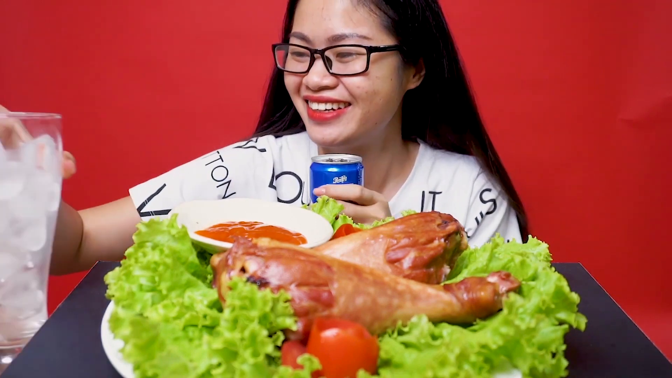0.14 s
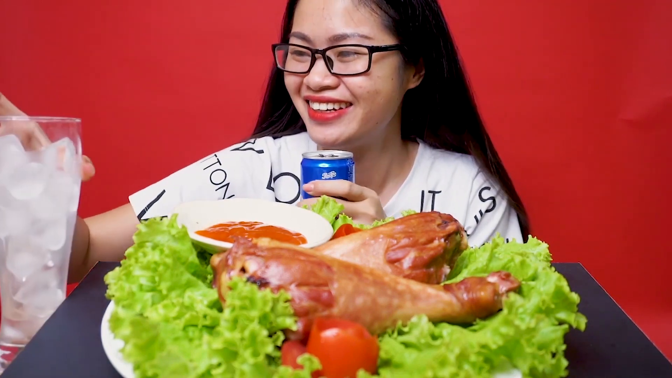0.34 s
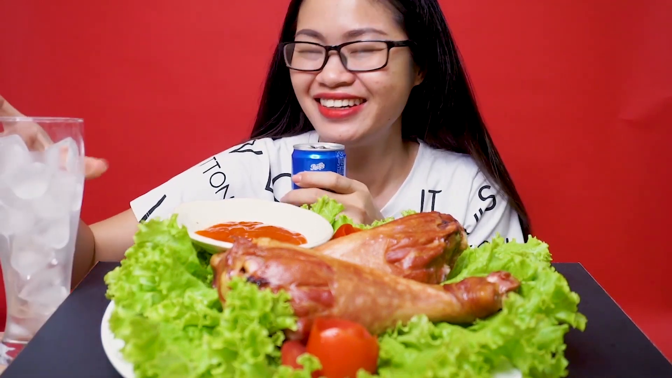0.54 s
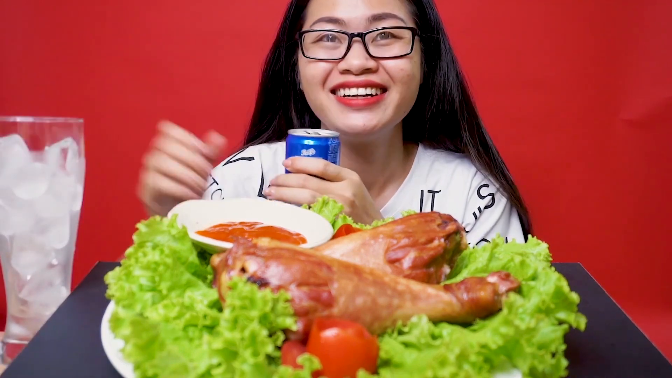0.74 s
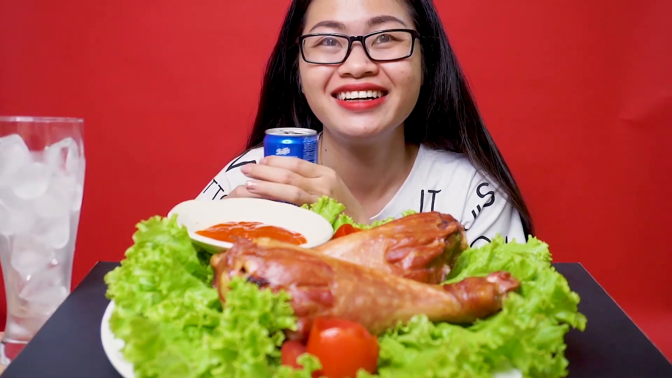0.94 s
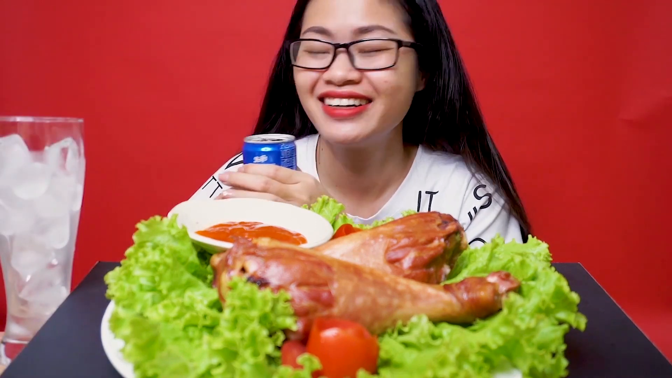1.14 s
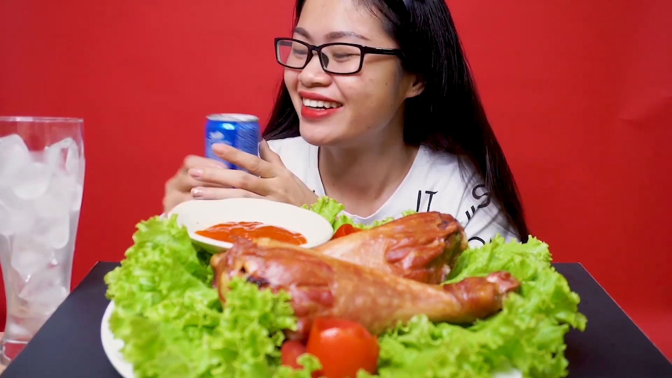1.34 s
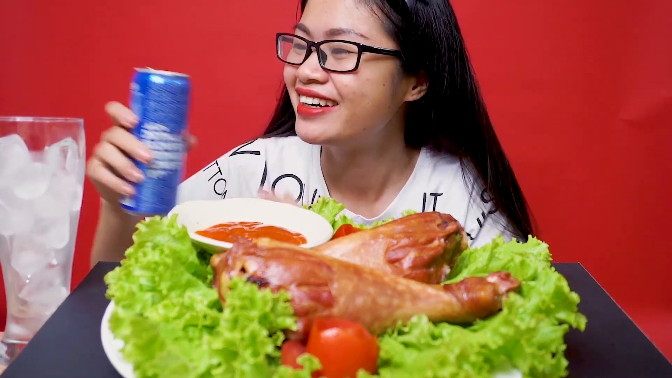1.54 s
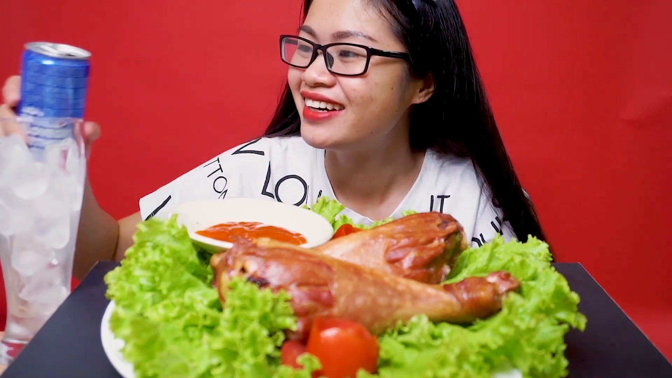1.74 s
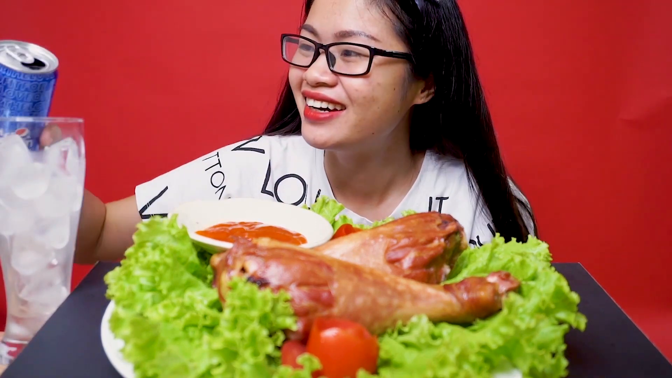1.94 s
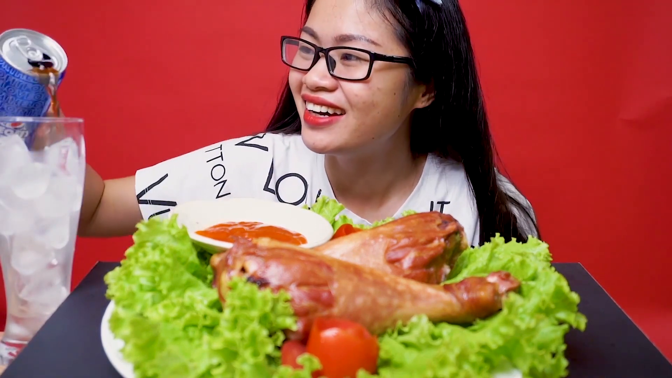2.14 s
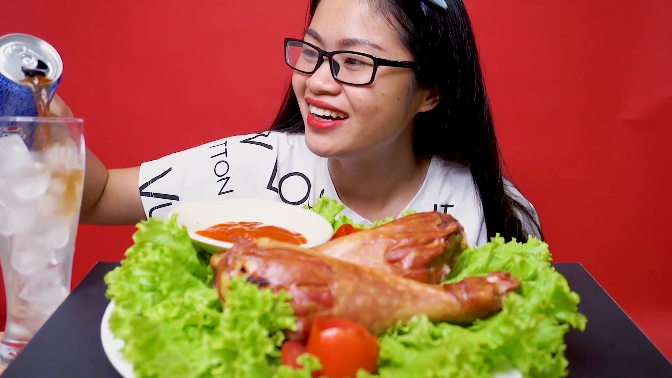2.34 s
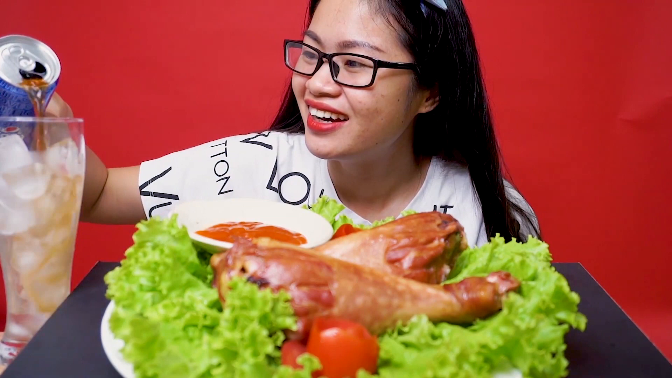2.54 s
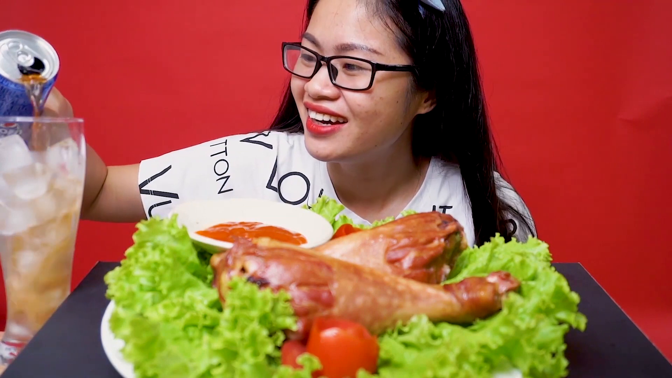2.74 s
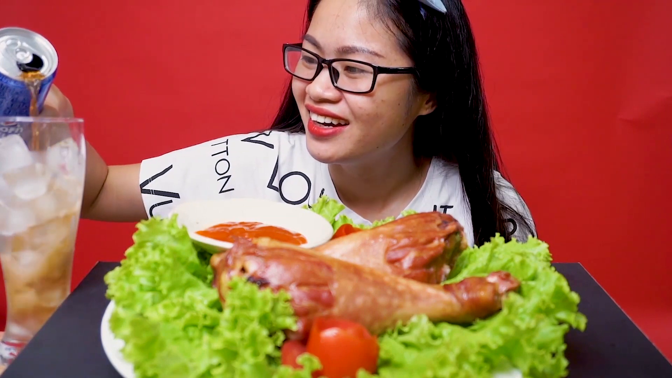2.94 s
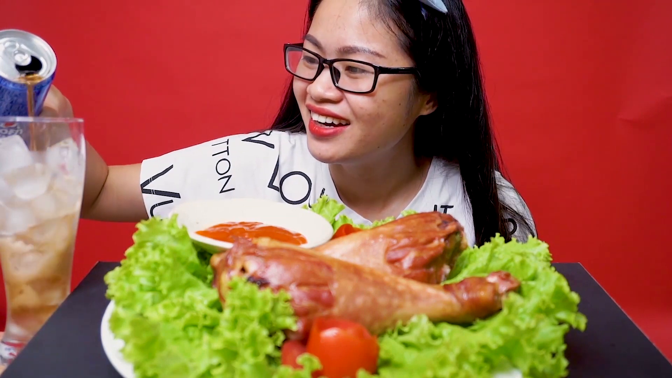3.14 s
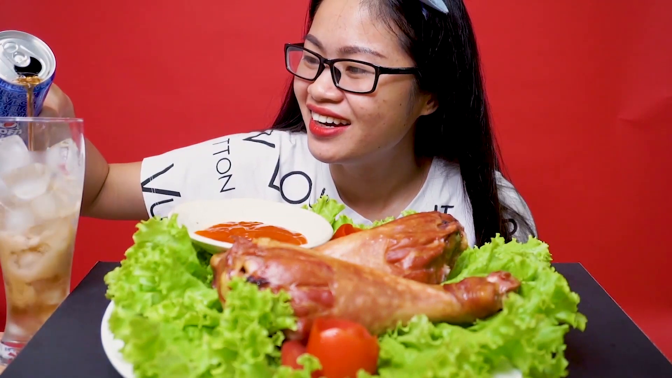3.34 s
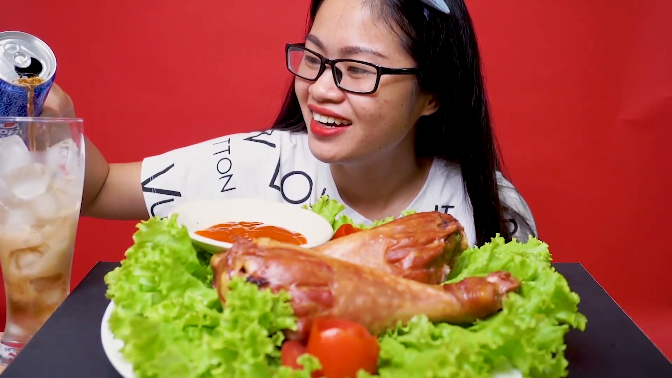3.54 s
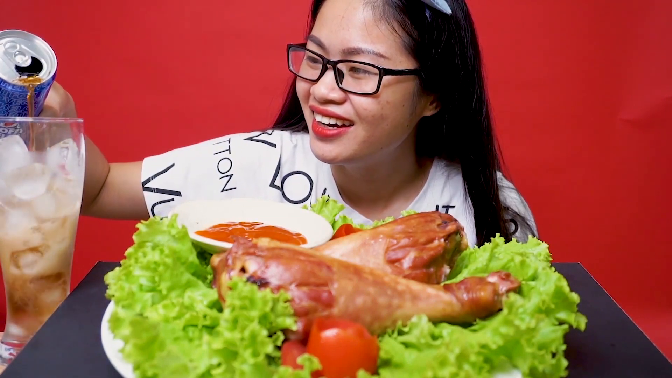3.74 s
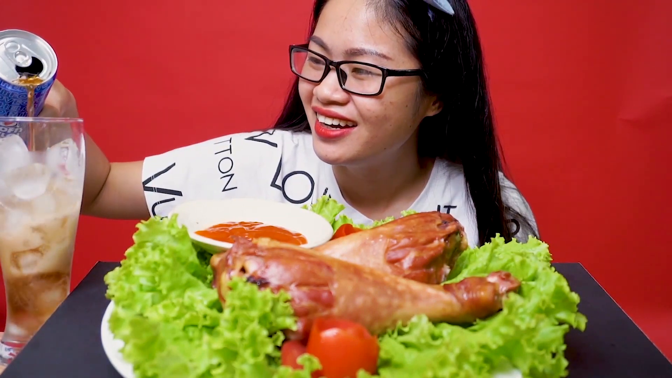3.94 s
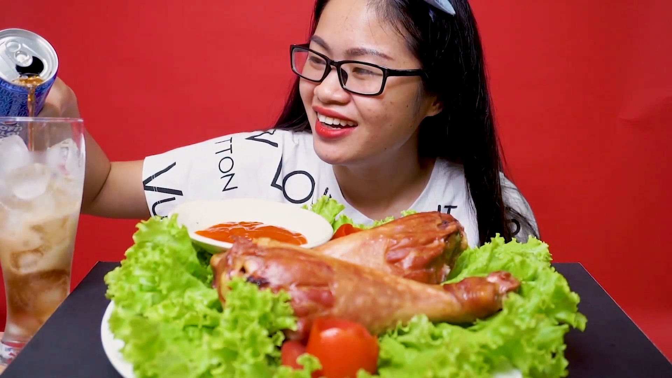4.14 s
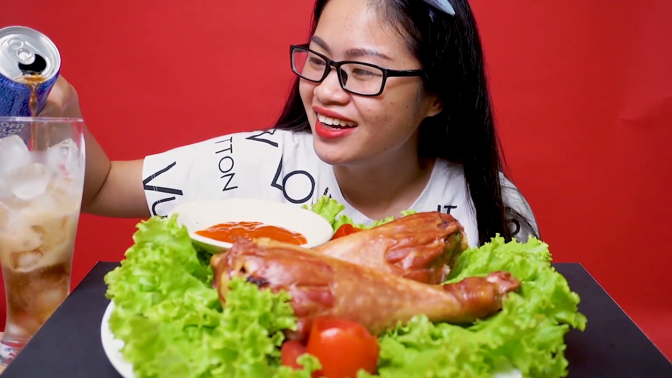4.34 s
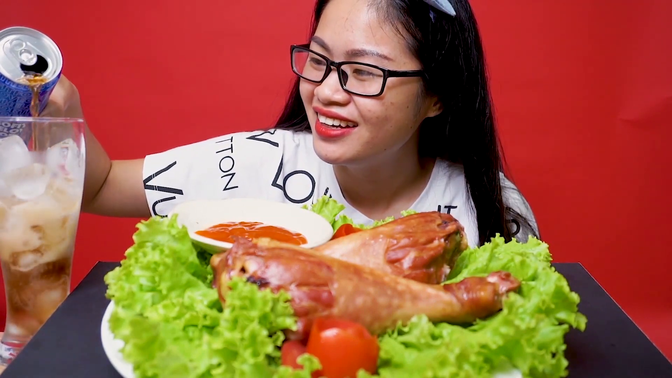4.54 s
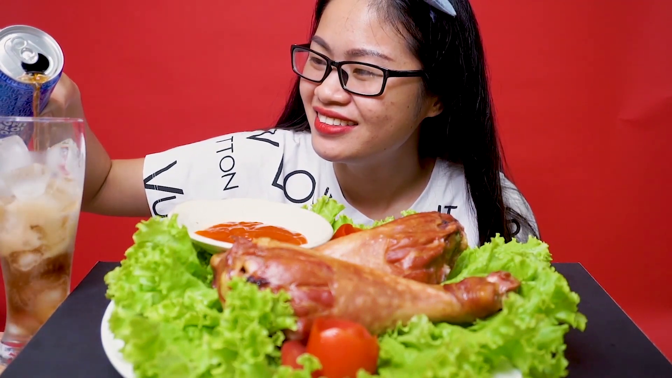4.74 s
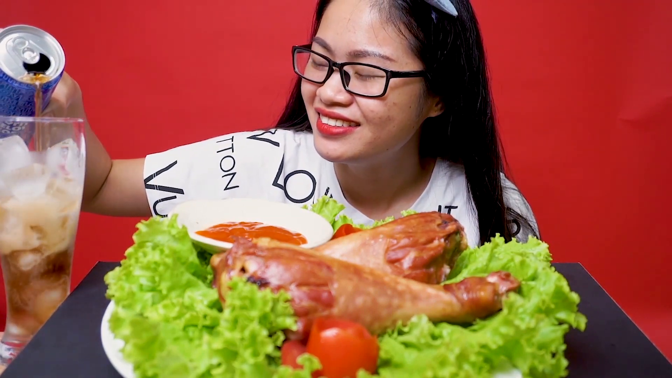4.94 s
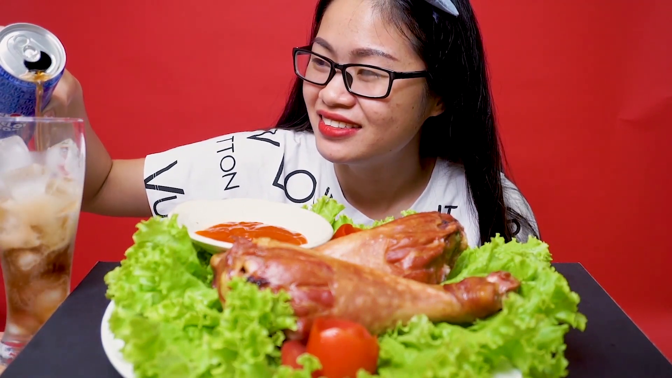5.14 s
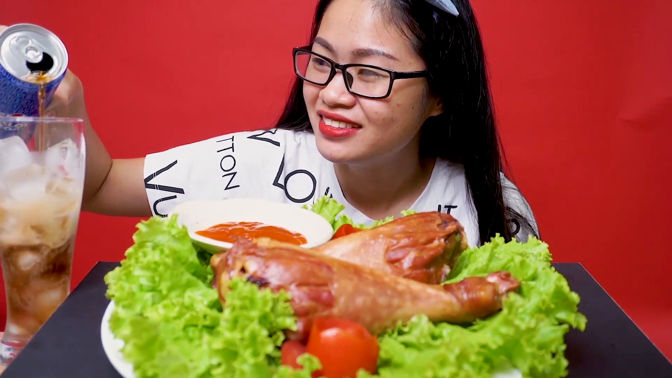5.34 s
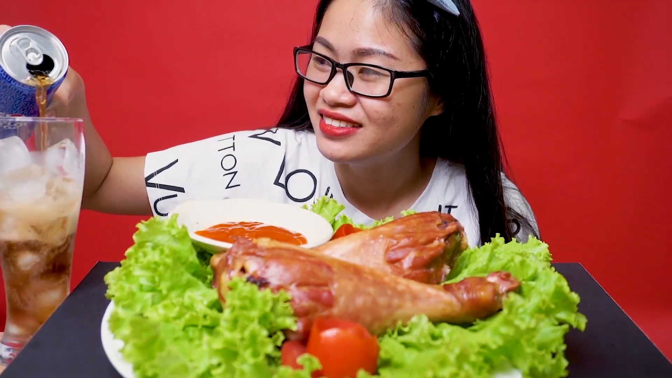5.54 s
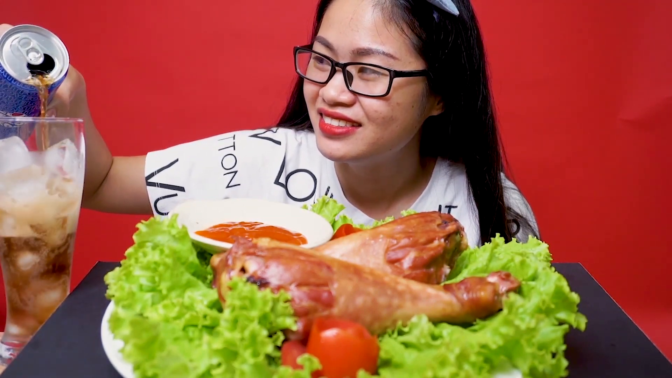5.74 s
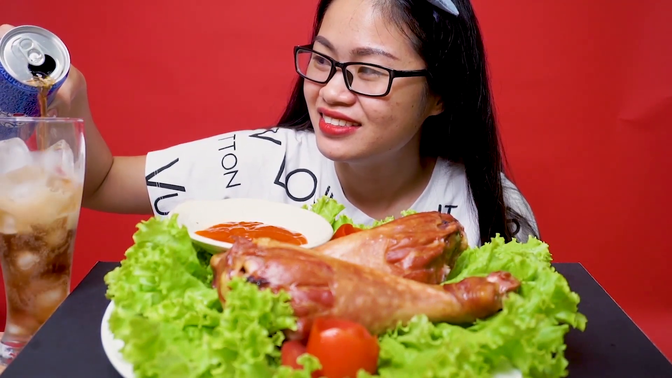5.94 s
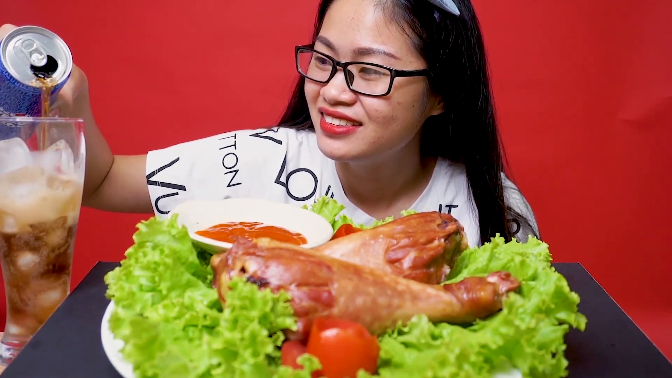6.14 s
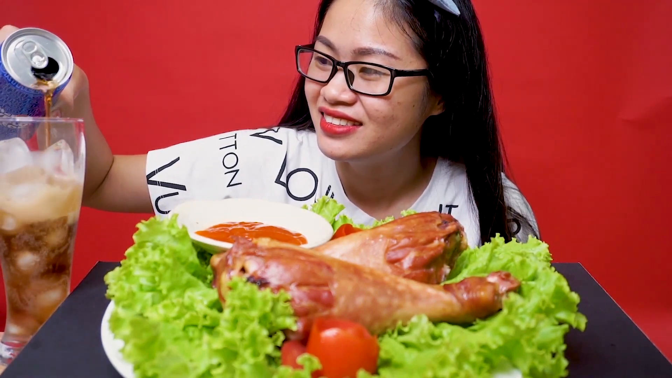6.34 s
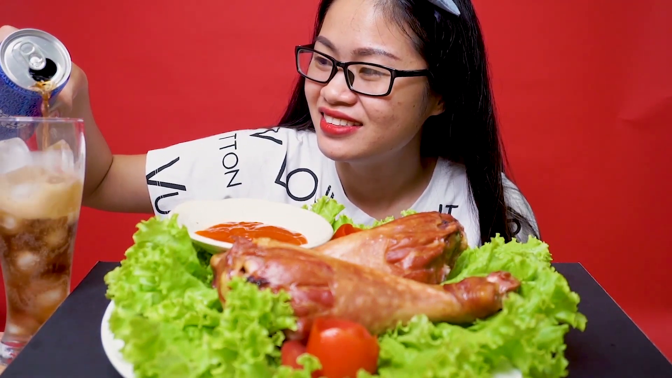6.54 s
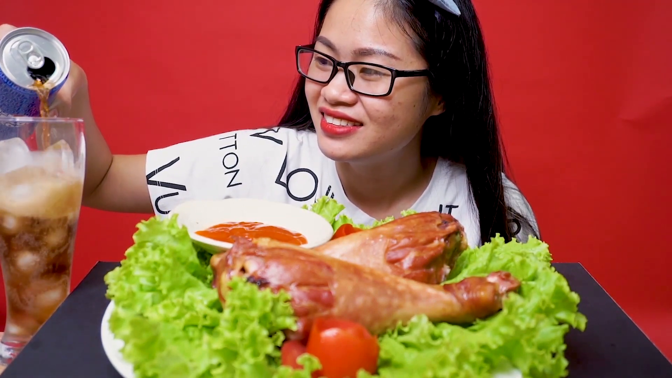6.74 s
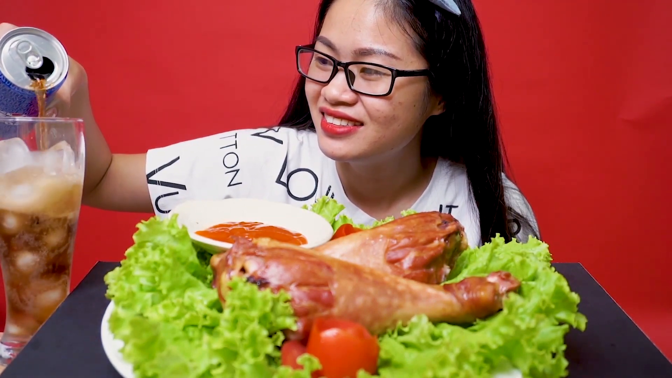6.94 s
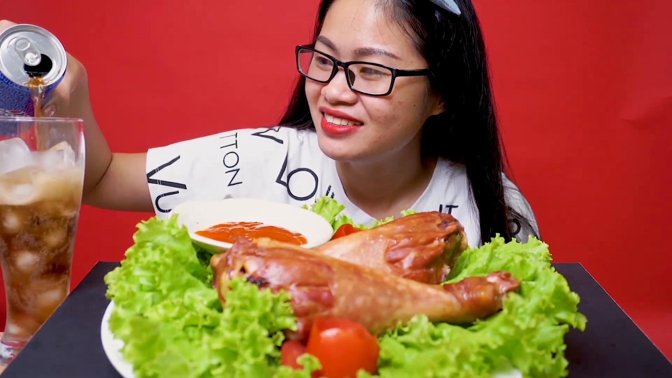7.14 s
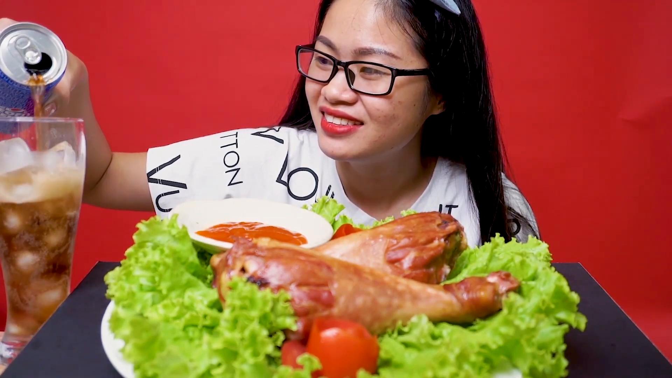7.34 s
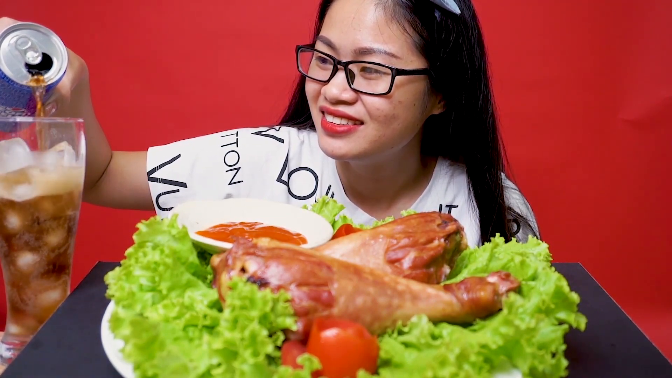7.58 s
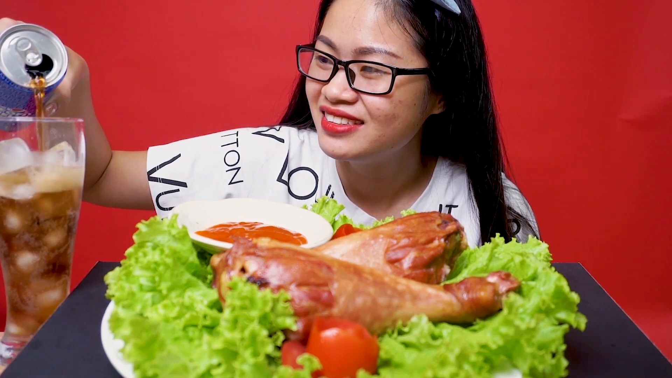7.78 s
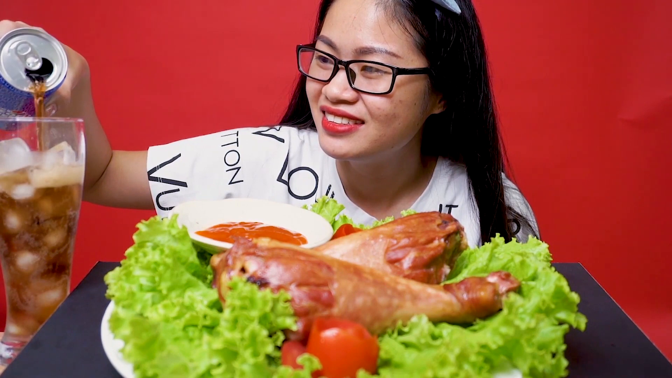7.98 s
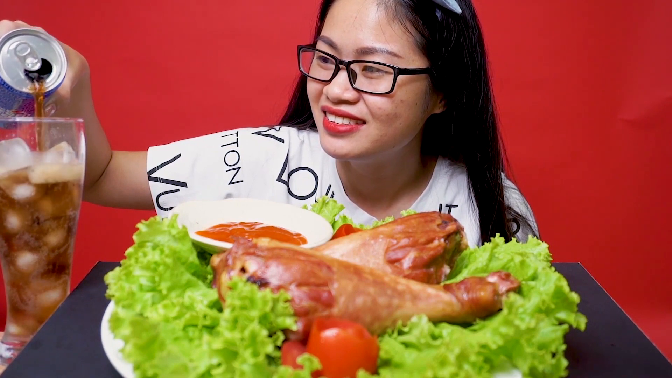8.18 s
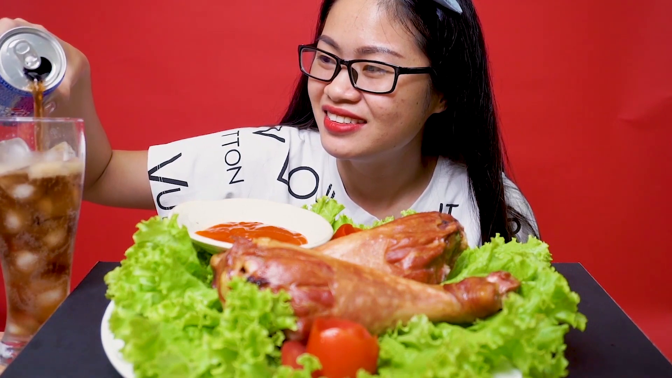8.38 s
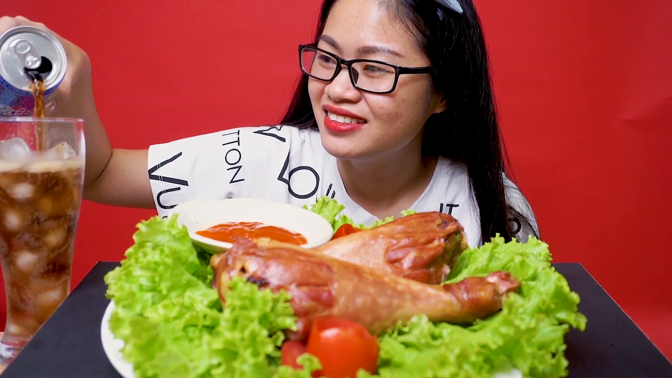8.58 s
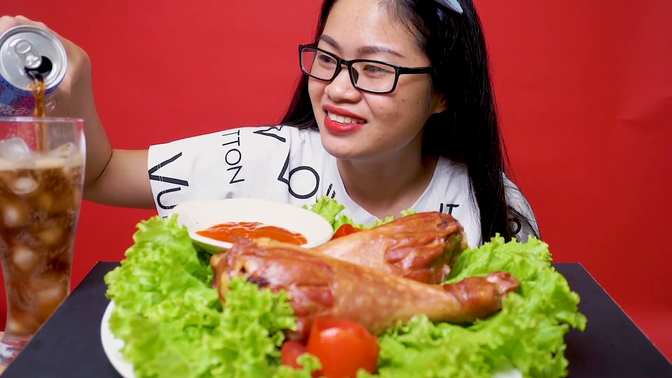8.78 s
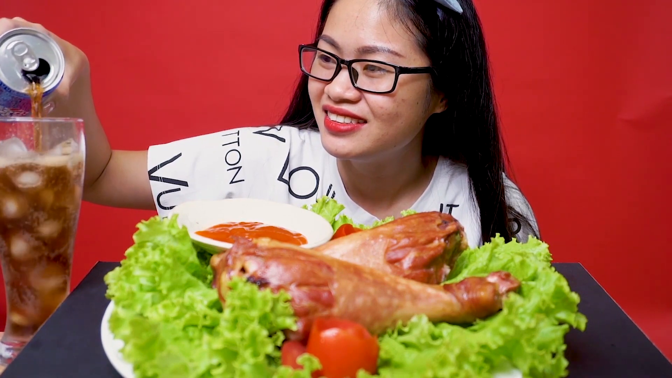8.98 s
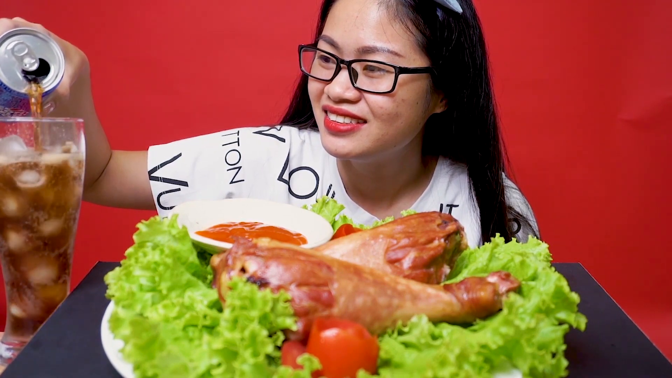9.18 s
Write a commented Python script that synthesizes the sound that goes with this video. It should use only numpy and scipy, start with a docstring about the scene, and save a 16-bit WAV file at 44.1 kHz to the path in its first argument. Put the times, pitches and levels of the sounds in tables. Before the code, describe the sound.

A tall glass of ice thuds hard onto a table, then soda pours thinly over cracking ice, fizzing and rising in pitch in a small humming room.

```python
"""At a table in a small humming room, a tall glass of ice is set down hard enough to overload the input.
An open can fizzes close by, then soda is poured in a thin stream. Struck glass and table are dying tones;
fizz is random clicks, coloured or sent through resonances. The ice cracks, shifts and bumps in short tones
and noise. Splashes ring the air above the drink, whose lowest pitch climbs as the glass fills; dull churns
are crowded clicks."""
import sys
import numpy as np
from scipy import signal
from scipy.fft import rfft, irfft, next_fast_len
from scipy.io import wavfile

SR = 44100
rng = np.random.default_rng(int(sys.argv[2]) if len(sys.argv) > 2 else 0)


def materialize(psi):
    """Save the field psi as 16-bit PCM at rate SR to the path in sys.argv[1].

    A 1-D psi becomes a single channel; in a 2-D psi each row is a channel.
    """
    bounded = np.clip(np.atleast_2d(psi).T, -1, 1)
    quanta = np.round(bounded * 32767).astype(np.int16)
    wavfile.write(sys.argv[1], SR, quanta)


N = 406161  # length in samples
TIME = np.arange(N) / SR  # s


def gain_of(db):
    """Turns decibels into a plain multiplier."""
    return 10 ** (np.asarray(db) / 20)


def evened(x):
    """Scales x to an average strength (rms) of 1."""
    return x / np.sqrt(np.mean(x ** 2) + 1e-20)


def read(points, hz):
    """Reads a table over pitch, joining its points on a log-frequency axis."""
    f, value = np.transpose(points)
    return np.interp(np.log(hz + 1), np.log(f + 1), value)


def curves(rows, before=None):
    """Turns each column after the first into a curve in time."""
    s, *columns = np.transpose(rows)
    return [np.interp(TIME, s, column, left=before) for column in columns]


def add(mix, s, sound):
    """Adds a sound into the mix from time s on, cut off at the end of the mix."""
    part = mix[round(s * SR):][:len(sound)]
    part += sound[:len(part)]


def coloured(x, spectrum):
    """Makes some pitches of x stronger than others, ending at rms 1."""
    size = next_fast_len(len(x))
    gain = gain_of(read(spectrum, np.fft.rfftfreq(size, 1 / SR)))
    return evened(irfft(rfft(x, size) * gain, size)[:len(x)])


def dying(x, t60s):
    """Lets each band of x die at its own speed; t60 is the time to fall by 60 dB."""
    hz, t, bands = signal.stft(x, SR, nperseg=256)
    fade = 10 ** (-3 * t / read(t60s, hz)[:, None])
    return signal.istft(bands * fade, SR, nperseg=256)[1][:len(x)]


def fall(t, t60):
    """A smooth decay that drops by 60 dB in t60 seconds."""
    return np.exp(-np.log(1000) * t / t60)


def ring(t, hz, t60):
    """A pure tone that dies away like a struck object."""
    return np.sin(2 * np.pi * hz * t) * fall(t, t60)


def resonate(x, hz, width):
    """Two equal resonances in a row, each of this width and gain 1, that follow the pitch hz."""
    turn = np.exp(2j * np.pi * np.cumsum(hz * np.ones(len(x))) / SR)
    r = np.exp(-np.pi * width / SR)
    # shift the pitch down to zero, smooth there, then shift back up
    smooth = signal.lfilter([(1 - r) ** 2], [1, -2 * r, r * r], x / turn + 1e-18)
    return 2 * (turn * smooth).real


def pops(per_s, spread_db, size=N):
    """Random clicks, many small and a few large, at rms 1."""
    height = gain_of(spread_db * np.minimum(rng.exponential(1, size), 4))
    sign = rng.choice([-1, 1], size)
    return evened(height * sign * (rng.random(size) < per_s / SR))


def swell(length):
    """A smooth rise and fall that stays above half height for the given length."""
    return signal.windows.hann(round(2 * length * SR))


def waver(per_s):
    """A random curve of rms 1 that takes a new direction per_s times a second."""
    knots = np.arange(0, TIME[-1] + 1, 1 / per_s)
    return evened(np.interp(TIME, knots, rng.standard_normal(len(knots))))


# Colour of the air noise: (frequency [Hz], relative level [dB per Hz])
AIR_NOISE = [(20, -19), (50, -3), (120, -7.5), (200, -6), (300, -7.5), (520, -7.5), (740, -11),
             (1150, -8.5), (1400, -16.5), (1900, -18), (2600, -23), (5000, -27), (10000, -32.5),
             (16000, -36.5)]
# Resonances of the fan's drone: (frequency [Hz], width [Hz], rms level [dB], before the deepest is varied)
FAN_DRONE = [(75.22, 6.77, -52), (127.85, 25, -57), (461.9, 50.2, -54.5), (1066.7, 239, -57)]
# Gain on the deepest drone: (time [s], level [dB])
DEEP_DRONE_LEVEL = [(0, 3.5), (.6, 8), (1.6, -1.5), (3.0, -4), (3.35, 3), (5.05, -2), (5.45, -12.5),
                    (6.9, -1.5), (9.21, -1)]


def room(hiss_db=-48):
    """Steady air noise, and a fan's drone made by noise through resonances."""
    deepest, *upper = [gain_of(db) * evened(resonate(rng.standard_normal(N), hz, width))
                       for hz, width, db in FAN_DRONE]
    hiss = gain_of(hiss_db) * coloured(rng.standard_normal(N), AIR_NOISE)
    return gain_of(curves(DEEP_DRONE_LEVEL)[0]) * deepest + sum(upper) + hiss


# The open can fizzes close by until it is lifted away: (time [s], level [dB])
CAN_LEVEL = [(0, -50), (.25, -55), (.6, -50.5), (.9, -55.5), (1.3, -55), (1.45, -62.5), (1.7, -99)]
# Resonances of the can: (frequency [Hz], width [Hz], relative level [dB])
CAN_RESONANCES = [(1912, 440, 3.5), (2556, 480, 0.5), (3250, 486, -2.5), (4103, 860, -2.5),
                  (5900, 840, -10.5)]


def can():
    """Fine bubbles burst inside the open can and excite its resonances."""
    bursts = pops(per_s=6500, spread_db=4.5)
    fizz = sum(gain_of(db) * resonate(bursts, hz, width) for hz, width, db in CAN_RESONANCES)
    return gain_of(curves(CAN_LEVEL)[0]) * evened(fizz)


# The base of the glass meets the table: (time [s], level [dB], contact time [s], rattle level [dB])
BASE_KNOCKS = [(.26338, 1.5, .00025, -13), (.2856, -15, .0004, -29), (.3355, -11.5, .0006, -24),
               (.34619, -21, .0009, -34)]
# Tones of glass and table top together: (frequency [Hz], level [dB], t60 [s]), before the knock's level
TABLE_TONES = [(75, -37, .9), (112, -33, .55), (208, -33, .5), (279, -29, .35), (330, -35, .25),
               (433, -25, .22), (559, -16, .18), (600, -17, .18), (772, -18, .18), (816, -27, .28),
               (854, -10, .12), (918, -17, .2), (1016, -4, .07), (1048, -3, .1), (1065, -2.5, .045),
               (1083, -18, .2), (1192, -8.5, .24), (1370, -22, .2), (1499, -14, .125), (1925, -4.5, .06),
               (2024, -8, .035), (2430, -17, .085), (2640, -45, .6), (3166, -16, .036), (3820, -19, .04),
               (6350, -27, .035)]
# Colour of the ice jolted in the glass: (frequency [Hz], relative level [dB per Hz])
RATTLE_COLOUR = [(40, -21), (160, -19.5), (400, -12.5), (600, 0.5), (1100, -9.5), (1600, -15.5),
                 (2200, -16), (3500, -30.5), (6000, -36), (9000, -51), (16000, -48.5)]
# How fast that rattle dies: (frequency [Hz], t60 [s])
RATTLE_FADE = [(100, 0.71), (600, 0.21), (1500, 0.296), (4000, 0.223), (12000, 0.098)]


def set_down(rattle_rise_s=0.00036, crack_db=-1, crack_t60=0.0202, crack_hz=3300, crack_width_hz=4200):
    """Each blow rings glass and table and jolts the ice; a longer contact is duller."""
    out, t = np.zeros(N), np.arange(SR) / SR
    tones = [gain_of(db) * ring(t, hz, t60) for hz, db, t60 in TABLE_TONES]
    tone_hz = np.transpose(TABLE_TONES)[0]
    for s, db, contact, rattle_db in BASE_KNOCKS:
        dulling = 1 / np.hypot(1, (tone_hz * contact) ** 2)
        body = dulling @ tones * (1 - np.exp(-t / .0005))
        rattle = dying(coloured(rng.standard_normal(SR), RATTLE_COLOUR), RATTLE_FADE)
        rattle *= 1 - np.exp(-t / rattle_rise_s)
        add(out, s, gain_of(db) * body + gain_of(rattle_db) * rattle)
    # only the first, hardest contact cracks brightly
    crack = rng.standard_normal(SR) * fall(t, crack_t60)
    crack = signal.sosfilt(signal.butter(2, 500, "highpass", fs=SR, output="sos"), crack)
    for _ in range(2):
        crack = resonate(crack, crack_hz, crack_width_hz)
    add(out, BASE_KNOCKS[0][0], gain_of(crack_db) * crack)
    return out


# Low tones of the table: (frequency [Hz], level [dB], t60 [s])
NUDGE_TONES = [(105, -34.5, 0.245), (197.4, -31, 0.1295), (270, -41, .1)]


def nudge(at_s=.503, rise_s=0.0046):
    """The hand lets go: a soft push wakes only low tones of the table."""
    t = np.maximum(TIME - at_s, 0)
    tones = sum(gain_of(db) * ring(t, hz, t60) for hz, db, t60 in NUDGE_TONES)
    return (1 - np.exp(-t / rise_s)) * tones


# Air resonances above the rising drink: (time [s], first [Hz], second [Hz], third [Hz], fourth [Hz])
AIR_PITCHES = [(2.3, 1320, 3153, 4300, 5980), (3.7, 1417, 2883, 4517, 5740), (4.3, 1506, 3100, 4360, 5990),
               (5.3, 1582, 3163, 4342, 5900), (6.6, 1683, 3430, 4110, 6230), (9.2, 1765, 3363, 4100, 6100)]
# Their sharpness and strength, first to fourth: (width [Hz], gain [dB])
AIR_STRENGTHS = [(450, -2.5), (574, -0.5), (662, 0), (597, -8.5)]


def air_column(x):
    """Lets x excite each resonance of the air in the glass, lowest first."""
    return [gain_of(db) * resonate(x, hz, width)
            for hz, (width, db) in zip(curves(AIR_PITCHES), AIR_STRENGTHS)]


# Ice cracks, most of all as the drink first hits it. Crunch levels are before the trims in ice():
# (time [s], ping level [dB], ping pitch [Hz], crunch level [dB])
ICE_CRACKS = [(1.5896, -29, 1697, -49), (2.1127, -25, 4250, -58), (2.293, -29.5, 3055, -44.5),
              (2.3128, -32.5, 4920, -30.5), (2.3295, -28, 4520, -36), (2.334, -22.5, 4460, -40),
              (2.356, -20, 3085, -31), (2.376, -25.5, 5000, -33.5), (2.3894, -25, 4490, -39.5),
              (2.4009, -25.5, 4093, -34.5), (2.592, -27, 4365, -30.5), (2.7014, -29, 4810, -42),
              (2.7993, -29.5, 1514, -34.5), (2.837, -28, 2915, -32), (2.8958, -26, 2970, -31),
              (3.0322, -40, 4400, -35.5)]
# Cubes bump in the rising drink: (time [s], plop level [dB], crunch level [dB], before the trims)
ICE_BUMPS = [(3.6373, -28.5, -43), (3.645, -22, -32.5), (3.7272, -22, -28.5), (4.0739, -14, -28.5),
             (4.194, -34.5, -31.5), (4.2135, -28, -36.5), (4.235, -18, -25), (4.628, -26, -32.5),
             (4.788, -29, -32.5), (4.925, -24.5, -36), (5.0723, -27.5, -32), (5.219, -25, -36.5),
             (5.3056, -28.5, -38), (5.9752, -20, -28), (5.9929, -28, -33.5), (6.0176, -24, -30.5),
             (6.6044, -25.5, -48.5), (6.6557, -24, -45.5), (6.677, -21, -40), (6.7279, -20, -30.5),
             (6.742, -22, -29.5), (8.7488, -30, -33.5)]


def ice(ping_t60=0.01148, snap_t60=0.00935, plop_ratio=0.967, column_db=27, crunch_db=3,
        crack_snap_db=-5, bump_snap_db=-11, crunch_hz=3800, crunch_width_hz=4000,
        snap_hz=8000, snap_width_hz=9000):
    """A crack or bump is a short ping, a crunch and a bright snap, and kicks the air column."""
    out, kicks, t = np.zeros(N), np.zeros(N), np.arange(SR // 20) / SR
    fade = fall(t, snap_t60)
    plop_hz = plop_ratio * curves(AIR_PITCHES)[0]  # just under the first air resonance
    cracks = [(*row, crack_snap_db) for row in ICE_CRACKS]
    bumps = [(s, db, plop_hz[round(s * SR)], force_db, bump_snap_db) for s, db, force_db in ICE_BUMPS]
    for s, db, hz, force_db, snap_db in cracks + bumps:
        crunch = resonate(fade * rng.standard_normal(len(t)), crunch_hz, crunch_width_hz)
        snap = resonate(fade * rng.standard_normal(len(t)), snap_hz, snap_width_hz)
        ping = gain_of(db) * ring(t, hz, ping_t60) * (1 - np.exp(-t / 0.00029))
        add(out, s, ping + gain_of(force_db + crunch_db) * crunch + gain_of(force_db + snap_db) * snap)
        add(kicks, s, gain_of([force_db + column_db]))
    return out + sum(air_column(kicks)[1:])  # the kicks sound all but the lowest resonance


# How fast the room's echo dies: (frequency [Hz], t60 [s])
ECHO_FADE = [(200, 0.42), (2000, 0.273), (6000, 0.214), (14000, 0.12)]


def echo(x, delay_s=.006):
    """The short, diffuse answer of a small room: x smeared by a dying noise."""
    tail = dying(rng.standard_normal(SR // 2), ECHO_FADE)
    tail = np.r_[np.zeros(round(delay_s * SR)), tail / np.linalg.norm(tail)]
    return signal.oaconvolve(x, tail)[:N]


POUR_AT = 2.32  # the stream reaches the ice [s]
# Colour of bursting foam: (frequency [Hz], relative level [dB per Hz])
FOAM_COLOUR = [(300, -13.5), (1000, -1), (2400, 1), (3800, 4.5), (5200, 4), (7200, -1.5), (8400, -4),
               (9400, -2.5), (12000, -7), (16000, -10.5)]


def foam(start_db=-56, full_db=-50.5, build_s=3.15, waver_db=0.6552, spit_db=-18.0, crackle_db=-13):
    """Foam bubbles burst in the open; the fizz grows as the head of foam builds."""
    age = TIME - POUR_AT
    level_db = full_db + (start_db - full_db) * np.exp(-np.maximum(age, 0) / build_s)
    level = (age > 0) * gain_of(level_db + waver_db * waver(per_s=17))
    fizz = coloured(pops(per_s=7000, spread_db=2.0), FOAM_COLOUR)
    # larger bubbles, at nine pitches
    crackle = evened(sum(resonate(pops(per_s=30, spread_db=2.0), hz, 970)
                         for hz in np.geomspace(2200, 13000, 9)))
    # drops flung clear of the foam
    spits = evened(resonate(pops(per_s=38, spread_db=2.5), 11000, 9800))
    return level * (fizz + gain_of(spit_db) * spits + gain_of(crackle_db) * crackle)


# The stream splashes on bare ice, then plunges into the drink and is muffled by foam. Levels are
# before the trims in stream(): (time [s], splash level [dB], gurgle level [dB])
STREAM_LEVELS = [(2.32, -59.5, -70), (2.8, -56, -59.5), (3.2, -55, -62.5), (3.7, -53, -52),
                 (4.0, -48.5, -50), (4.3, -49.5, -50), (5.7, -50.5, -52.5), (6.2, -55, -56.5),
                 (7.0, -55, -54), (8.3, -58, -57), (9.21, -52.5, -53)]


def stream(splash_db=-2.5, gurgle_db=-0.5, tick_db=-6, waver_db=1.52):
    """Droplets and bubbles of the unsteady stream sound the air column; the chilled ice ticks."""
    flow = gain_of(waver_db * waver(per_s=17))
    splash_level, gurgle_level = flow * gain_of(curves(STREAM_LEVELS, before=-120))
    lowest, *upper = air_column(pops(per_s=3000, spread_db=3.0))
    ticks = evened(sum(air_column(pops(per_s=34, spread_db=0.85))))
    splash = gain_of(splash_db) * evened(sum(upper))
    gurgle = gain_of(gurgle_db) * evened(lowest) + gain_of(tick_db) * ticks
    return splash_level * splash + gurgle_level * gurgle


# Patches of foam crackle and sizzle, timed at their middle:
# (time [s], length [s], pitch [Hz], width [Hz], level before the swell [dB])
SIZZLE_PATCHES = [(2.364, .04, 4000, 3800, -44), (2.386, 0.036, 11500, 6000, -46.5),
                  (2.416, .05, 7140, 1200, -49.5), (2.921, .15, 10600, 4990, -55.5),
                  (2.999, 0.0267, 5000, 3000, -48.5), (4.201, 0.99, 9480, 1100, -69),
                  (6.365, 0.023, 9000, 4500, -53.5), (6.495, 0.073, 8300, 2200, -52),
                  (6.697, 0.0454, 3890, 1200, -47.5), (6.992, 0.128, 9250, 4500, -56.5)]


def sizzles():
    """Tiny bubbles of like size burst together, near one pitch."""
    out = np.zeros(N)
    for s, length, hz, width, db in SIZZLE_PATCHES:
        shape = swell(length)
        bursts = pops(per_s=400, spread_db=4.0, size=len(shape))
        add(out, s - length, gain_of(db) * shape * evened(resonate(bursts, hz, width)))
    return out


# Bubbles trapped by the stream: (time [s], level before decay [dB], starting pitch [Hz])
TRAPPED_BUBBLES = [(2.33, -42, 1698), (2.357, -41.5, 1652), (2.518, -43, 1657), (2.629, -39.5, 1500),
                   (2.809, -36, 978), (5.334, -36.5, 968), (8.927, -35.5, 1055), (8.995, -38, 1029),
                   (9.075, -32, 1005), (9.165, -35.5, 1073)]


def bubbles(t60=0.059, bend=3.86):
    """A bubble rings and climbs in pitch as it nears the surface."""
    out, t = np.zeros(N), np.arange(SR // 10) / SR
    for s, db, hz in TRAPPED_BUBBLES:
        # the heard pitch is hz * (1 + 2 * bend * t)
        add(out, s, gain_of(db) * ring(t, hz * (1 + bend * t), t60))
    return out


# Dull churns in the glass: the ice shifts near 6 s, the drink glugs at the end. Timed at the middle:
# (time [s], length [s], level before the swell [dB])
CHURNS = [(5.954, .05, -42.5), (5.999, 0.033, -39.5), (8.87, .035, -43), (8.93, 0.0195, -41),
          (9.001, 0.0336, -45), (9.081, 0.014, -42), (9.19, 0.0328, -39)]
# Colour of the churns: (frequency [Hz], relative level [dB per Hz])
CHURN_COLOUR = [(80, -49), (200, -13), (500, -6), (820, -5.5), (1030, -2), (1280, -2), (1450, -9),
                (2400, -13), (5000, -31), (16000, -47)]


def churns():
    """Dull churns in the glass, from shifting ice or glugging drink: crowded clicks that swell and fade."""
    out = np.zeros(N)
    for s, length, db in CHURNS:
        shape = swell(length)
        clicks = pops(per_s=1000, spread_db=3.5, size=len(shape))
        add(out, s - length, gain_of(db) * shape * coloured(clicks, CHURN_COLOUR))
    return out


# A cube taps the wall of the glass: (time [s], level [dB])
WALL_TAPS = [(5.974, -48), (6.0176, -29.5)]
# Tones of the wall: (frequency [Hz], level added to the tap's [dB], t60 [s])
WALL_TONES = [(2200, -31, 0.18), (3640, -11.5, 0.06), (6410, 5, 0.0382), (10100, -14.5, 0.074)]


def clinks():
    """The wall of the glass rings briefly, damped by drink and ice."""
    out, t = np.zeros(N), np.arange(SR // 4) / SR
    for s, db in WALL_TAPS:
        add(out, s, sum(gain_of(db + tone_db) * ring(t, hz, t60) for hz, tone_db, t60 in WALL_TONES))
    return out


def scene():
    """Adds up all sounds; only those of the drink and its ice get an echo."""
    drink = ice() + foam() + stream() + sizzles() + bubbles() + churns()
    glass = set_down() + nudge() + clinks()
    return (room() + can() + glass + drink + gain_of(-9) * echo(drink))[None]


def record(dry, edge_hz=15870):
    """The input overloads with a rounded knee; then the highest treble is cut."""
    clipped = dry / (1 + dry ** 8) ** (1 / 8)
    lowpass = signal.firwin(511, edge_hz, window=("kaiser", 9), fs=SR)
    return signal.oaconvolve(clipped, lowpass[None], "same")


dry = scene()
out = record(dry)
materialize(out)
```